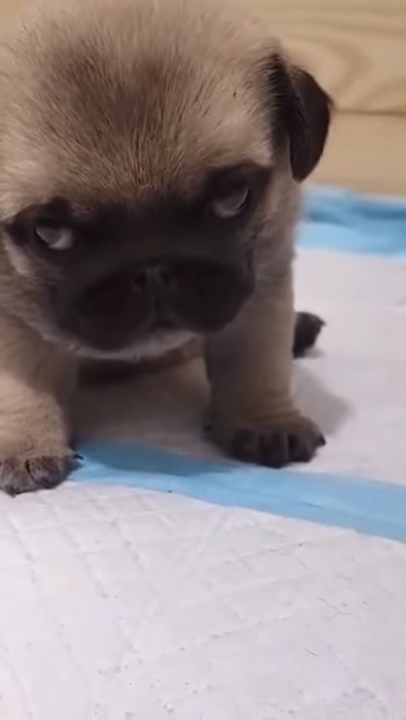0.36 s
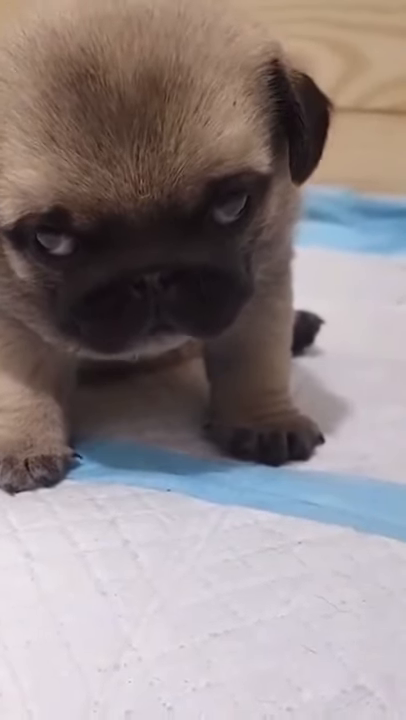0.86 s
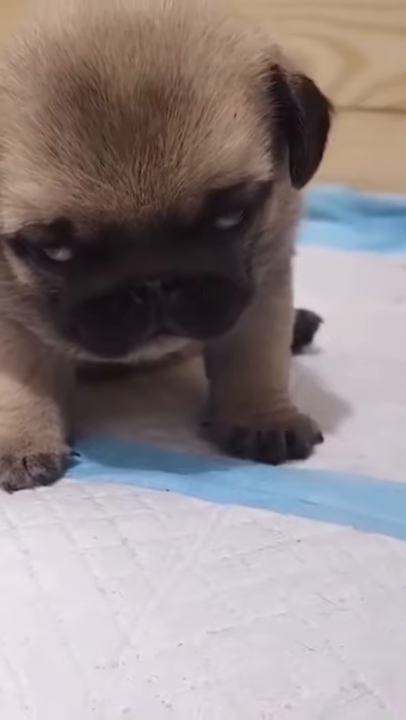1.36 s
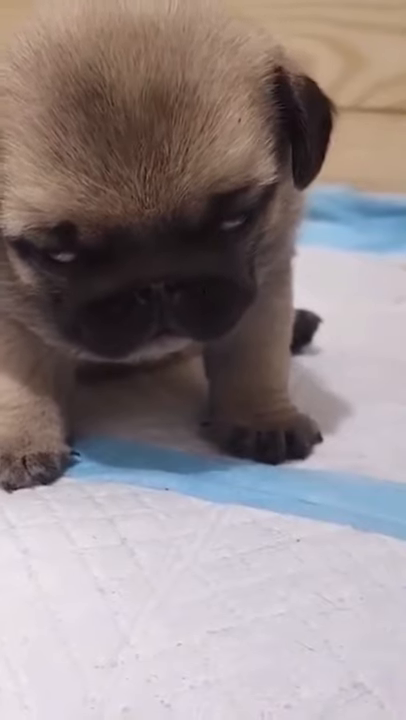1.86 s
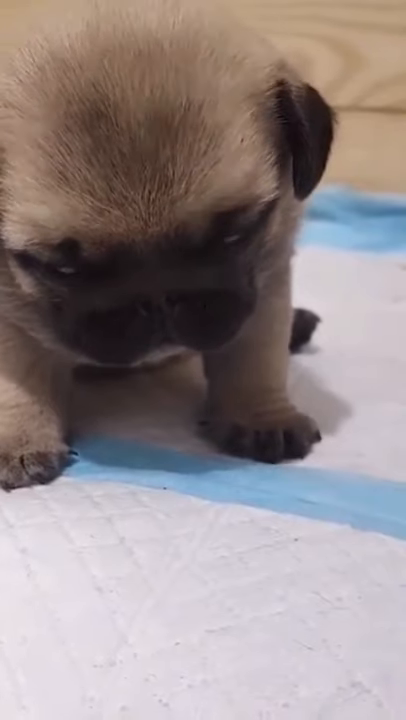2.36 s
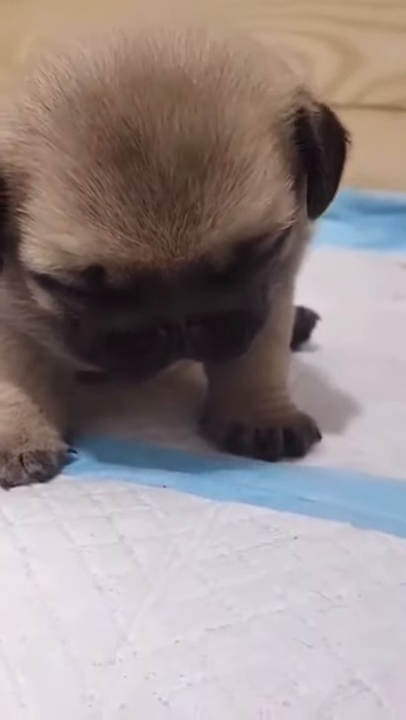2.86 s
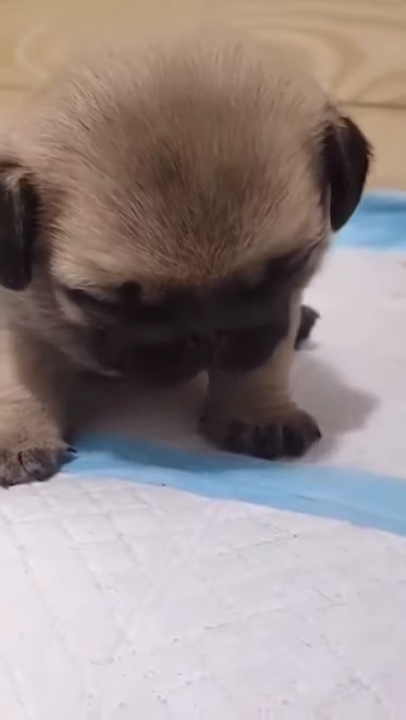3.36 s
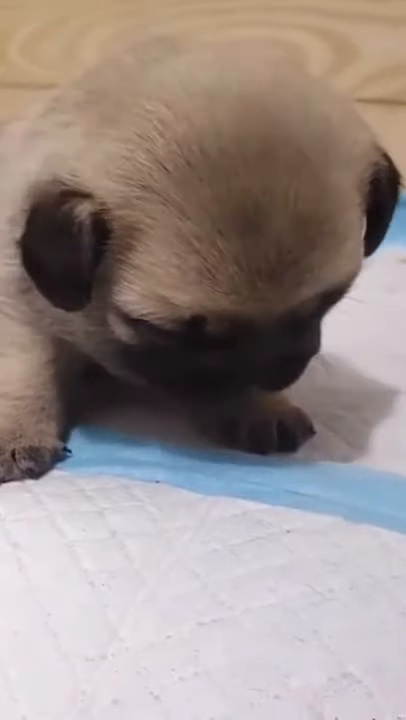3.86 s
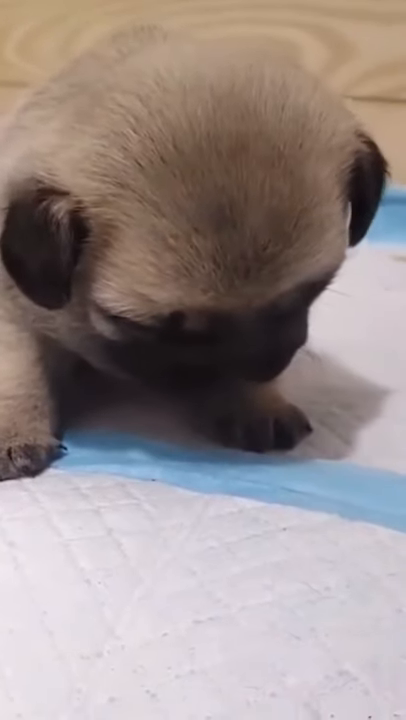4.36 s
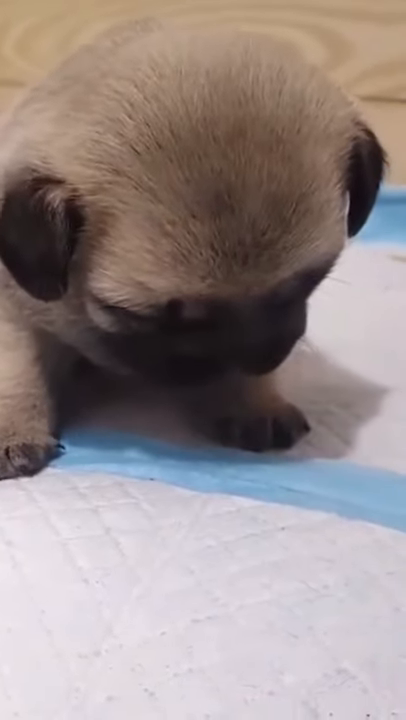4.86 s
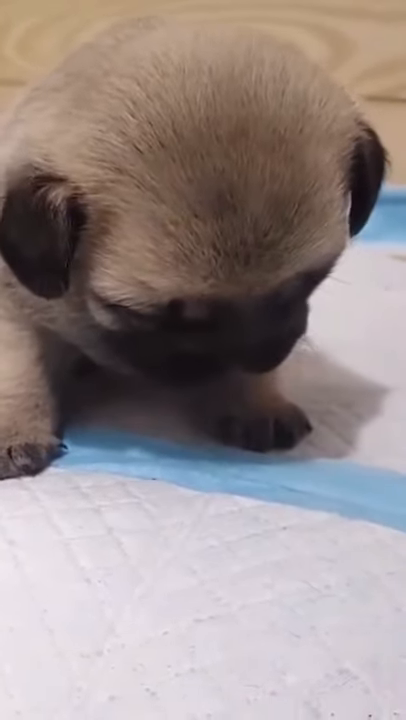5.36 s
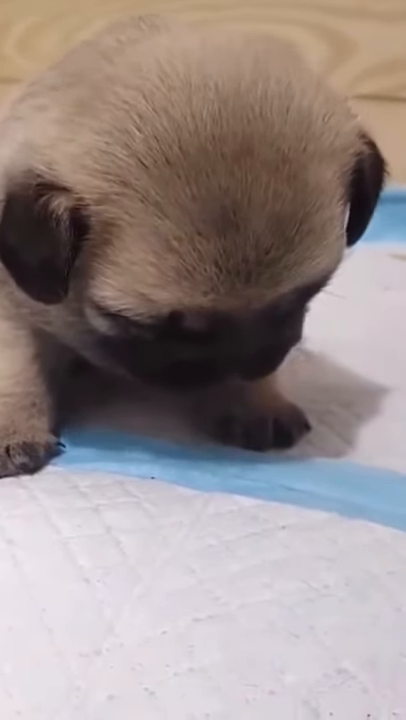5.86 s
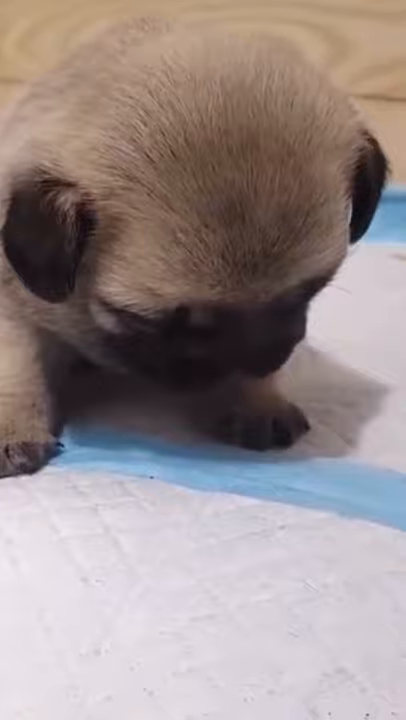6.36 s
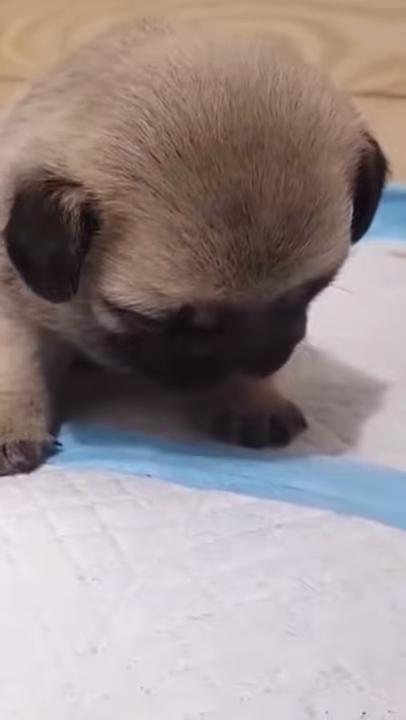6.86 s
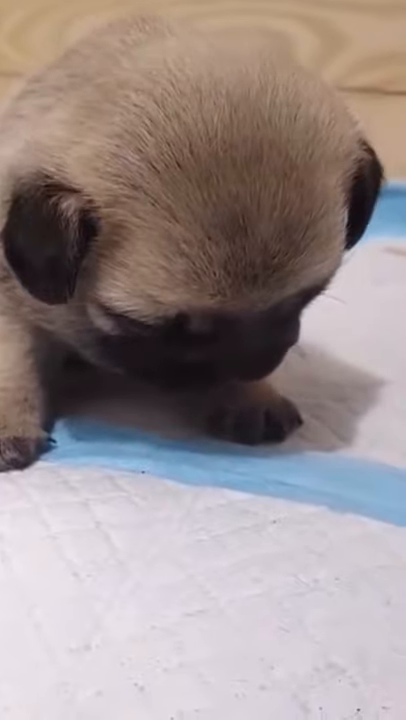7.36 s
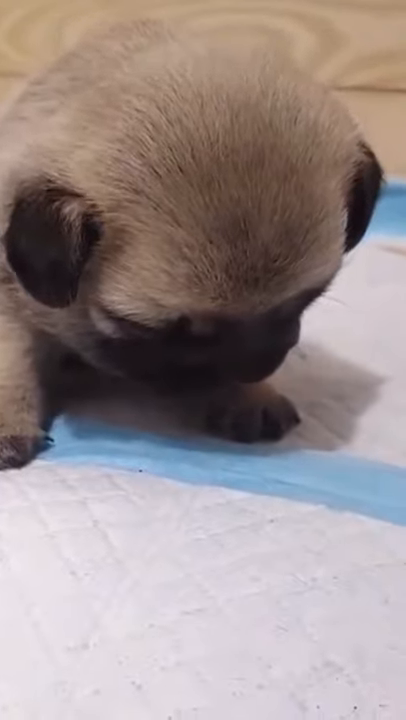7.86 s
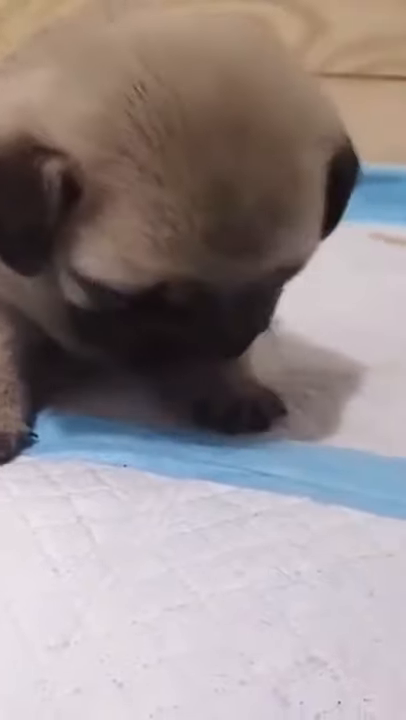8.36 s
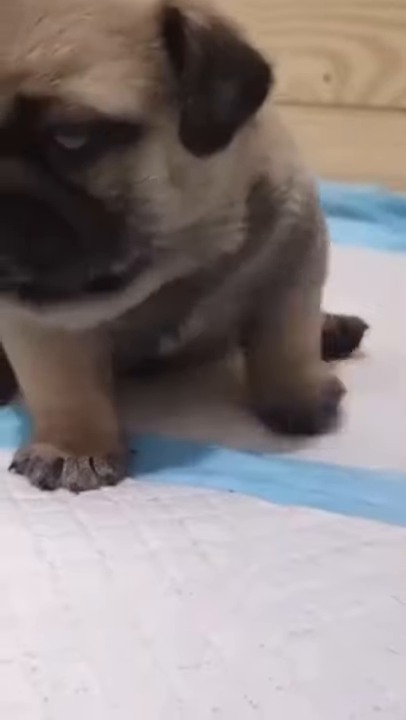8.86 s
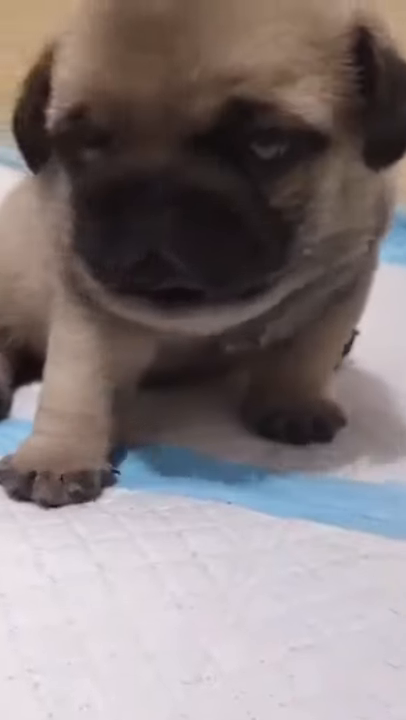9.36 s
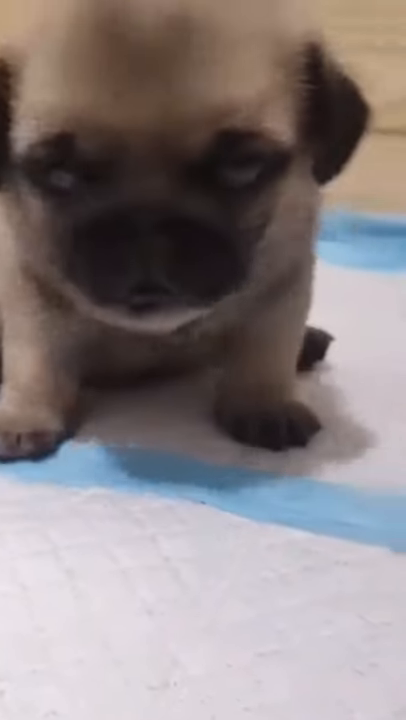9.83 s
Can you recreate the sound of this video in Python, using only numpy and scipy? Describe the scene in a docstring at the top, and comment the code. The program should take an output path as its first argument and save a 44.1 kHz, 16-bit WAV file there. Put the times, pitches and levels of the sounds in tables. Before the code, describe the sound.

Close to a phone microphone in a quiet room, a puppy shifts on a crinkly pad over wooden boards with soft thumps and scuffs. A rubber squeaky toy lets out one clean, falling squeak, then after more knocks comes a fast run of five bright airy squeezes with lower refilling squeaks between them. A few paw sounds follow over a low hum.

```python
"""A quiet room with a wooden floor: a rubber squeaky toy is worked close to a phone as a puppy shifts on a pad.
The toy is a reed driving a tube: high and airy on each squeeze, lower and clean as the toy refills.
Paws and hands knock and slide, sounding as decaying board modes and bursts of shaped noise; fur or cloth
brushes the pad as grainy noise. Behind lie a faint far tone of steady partials and a low hum of noise."""
import sys
import numpy as np
from scipy import signal
from scipy.fft import rfft, irfft
from scipy.io import wavfile
from scipy.ndimage import uniform_filter1d

SR = 44100
rng = np.random.default_rng(int(sys.argv[2]) if len(sys.argv) > 2 else 0)


def ratio_of_db(decibels):
    """Turn decibels (scalar or array-like) into linear amplitude factors; 0 dB maps to 1."""
    return 10 ** (np.asarray(decibels, float) / 20)


def to_wav(sig):
    """Store sig (one row per channel, or 1-D mono) as 16-bit WAV at the path in sys.argv[1].

    Samples outside -1..1 are clipped; the rate is SR.
    """
    pcm = np.clip(np.atleast_2d(sig), -1, 1) * 32767
    pcm = np.round(pcm).astype(np.int16)
    wavfile.write(sys.argv[1], SR, pcm.T)  # frames by channels


N = 439677  # samples
LEFT_RIGHT = np.array([[1], [-1]])  # signs of a side signal in the two channels


def shade(points, hz, axis=1):
    """Spectral envelope: dB of a (Hz, dB, ..) table at hz, interpolated on a log-frequency axis."""
    points = np.array(points, float)
    return np.interp(np.log(np.maximum(hz, 1)), np.log(points[:, 0]), points[:, axis])


def peaks(hz, modes):
    """Resonance: power passed by a set of (Hz, width Hz, dB) modes."""
    return sum(ratio_of_db(db) ** 2 / (1 + (2 * (hz - f) / w) ** 2) for f, w, db in modes)


def noise(size, gain):
    """Filtered noise: rms 1, with the amplitude spectrum gain(Hz)."""
    spectrum = rfft(rng.standard_normal(size)) * gain(np.fft.rfftfreq(size, 1 / SR))
    x = irfft(spectrum, size)
    return x / x.std()


def walk(size, rate):
    """Slow random modulation: spread 1, changing about rate times a second."""
    return noise(size, lambda hz: 1 / (1 + (hz / rate) ** 4))


def add(out, sound, s):
    """Superposition: sound is summed into out from s seconds on."""
    i = int(s * SR)
    out[..., i:i + sound.shape[-1]] += sound[..., :N - i]


# Resonances of the reed's tube: mode_hz, width_hz, squeeze_db, refill_db
TUBE_MODES = [(4250, 140, 23, 10), (6060, 180, 13.5, -24), (7710, 120, 17.5, 7.5), (9686, 81, 4.5, 5)]


def tube_modes(way):
    """Tube resonance: the modes as (Hz, width Hz, dB) for way 0 (squeeze) or 1 (refill)."""
    return [(row[0], row[1], row[2 + way]) for row in TUBE_MODES]


# Overtone strength between the tube's peaks: pitch_hz, squeeze_db, refill_db
OVERTONE_COLOUR = [(1399, -11.5, 2), (1890, -4, -10.5), (2035, 2, -1), (2070, 2, -26), (2190, -3, -7),
                   (3300, -12, -11.5), (4500, 8.5, -9), (6139, 3.5, -25), (8800, -19, -18),
                   (11000, -15, -16)]
# Level at the very top of the treble, with a narrow dip near 10.7 kHz: pitch_hz, level_db
TOP_LEVEL = [(10000, 0), (10700, -31.5), (11500, -5.5), (12700, -13), (13200, -35)]
# Pairs are (squeeze, refill)
JITTER = (.0036, .001)  # pitch unsteadiness as a share of the pitch
SHIMMER_DB = (.7, .5)  # each overtone wavers alone, by this much more every octave up
FALL, SAG = (2.6, 3.6), (0.96, 27)  # after the note: dying away in dB/ms, pitch sag in 1/s
BRIGHTEN = 0.5  # a refill's upper overtones gain this many dB an octave for each dB of fundamental
# On a squeeze the overtones above BLUR_HZ lose step with the reed, by about BLUR_RAD;
# that limit sinks with the reed's own pitch, by the power SLACK_BLUR
BLUR_RAD, BLUR_HZ, SLACK_BLUR = 1.2, 10000, 3


def reed(note, t, way):
    """Harmonic series of a slapping reed, shaped by tube resonance; returns the voice and the reed's phase."""
    s, hz, tone_db, over_db = np.transpose(note)
    late = np.maximum(t - s[-1], 0)
    tube = tube_modes(way)
    # pressure in the toy changes smoothly, so the pitch bends round its corners
    pitch = np.interp(t, s, hz) * np.exp(-SAG[way] * late)
    pitch = uniform_filter1d(uniform_filter1d(pitch, size=250), size=250)
    phase = 2 * np.pi * np.cumsum(pitch * (1 + JITTER[way] * walk(len(t), 270.0))) / SR

    k = np.arange(2, 20)[:, None]  # overtone numbers
    # the reed slaps once a cycle: overtones start in step, each tube peak turning them by half a turn
    lag = sum(np.arctan(2 * (k * pitch - f) / w) for f, w, _ in tube) + 0.17 * k ** 2
    wander = np.array([walk(len(t), 250.) for _ in k])
    clear_hz = BLUR_HZ * (pitch / pitch.max()) ** SLACK_BLUR
    lag = lag + (1 - way) * BLUR_RAD / (1 + (clear_hz / (k * pitch)) ** 12) * wander

    between = ratio_of_db(2 * shade(OVERTONE_COLOUR, k * pitch, axis=way + 1))
    colour = np.sqrt(between + peaks(k * pitch, tube)) * ratio_of_db(shade(TOP_LEVEL, k * pitch))
    tone = np.interp(t, s, tone_db)
    colour = colour * ratio_of_db(way * BRIGHTEN * (tone + 14) * np.log2(np.minimum(k, 12) / 2))
    shimmer = np.array([walk(len(t), 110.0) for _ in k])
    colour = colour * ratio_of_db(SHIMMER_DB[way] * np.log2(k) * shimmer)

    fade = ratio_of_db(-1000 * FALL[way] * late)  # with squeak()'s own fall, overtones die twice as fast as the tone
    overtones = (colour * np.cos(k * phase - lag)).sum(axis=0)
    return ratio_of_db(tone) * np.sin(phase) - fade * ratio_of_db(np.interp(t, s, over_db)) * overtones, phase


# Noise level beside the fundamental over the note: share of the note (0-1), squeeze_db, refill_db
NOISE_COURSE = [(0, -8, -26.5), (.12, -5.5, -39), (0.451, -12, -46.5), (0.752, -7.5, -44), (1, -13, -29.5)]
# Spectrum of that noise, relative: pitch_hz, squeeze_db, refill_db
NOISE_SPECTRUM = [(700, -21, -9), (2470, -8.5, -7.5), (3946, -25.5, -4.5), (5730, -2, -10),
                  (8200, -9, -2.5), (8700, -20.5, -11.5), (10970, -9, -9.5)]
SLAP_DB, SLAP_LOSS = -30, 9  # a weaker tone hardly slaps: overtones and noise lose this many dB per dB below


def note_noise(note, t, way, phase):
    """Amplitude modulation: broad noise with the tube's peaks, swelling once a cycle of the reed."""
    s, _, tone_db, _ = np.transpose(note)
    tube = tube_modes(way)

    def spectrum(f):
        return ratio_of_db(shade(NOISE_SPECTRUM, f, axis=way + 1) + shade(TOP_LEVEL, f)) * np.sqrt(1 + peaks(f, tube))

    # the noise differs between the channels above 5 kHz
    mid, side = noise(len(t), spectrum), noise(len(t), spectrum)
    side = signal.sosfilt(signal.butter(4, 5000, "high", fs=SR, output="sos"), side)
    share, *noise_db = np.transpose(NOISE_COURSE)
    # the opening is as short on a long note as on a quick one
    done = np.maximum((t - s[0]) / (s[-1] - s[0]), np.minimum((t - s[0]) / .11, share[1]))
    weak_db = SLAP_LOSS * min(tone_db[0] - SLAP_DB, 0)
    tone = np.interp(t, s, tone_db)
    level = ratio_of_db(np.interp(done, share, noise_db[way]) + tone + weak_db + 2.0 * walk(len(t), 60.))
    return (mid + side * LEFT_RIGHT) * (1 + .6 * np.cos(phase)) * level


# Pairs are (squeeze, refill)
RISE, NOISE_FALL = (8., 5.), (2.6, 1.2)  # onset, and dying away of the noise, dB/ms
PUFF_DB = -61.5  # low push of air on the microphone while the toy sounds
FLUTTER_DB, FLUTTER_S = (-24, -20.5), .022  # rough flutter over the tone as the reed catches; settling time
FLUTTER_HZ = (920, 614)  # centre and width of the flutter's band


def squeak(note, way):
    """Self-sustained reed: one note (way 0 squeezed, 1 refilling) of voice, noise, puff and catching flutter."""
    s, _, tone_db, _ = np.transpose(note)
    t = np.arange(s[0] - .03, s[-1] + .05, 1 / SR)
    early, late = np.maximum(s[0] - t, 0), np.maximum(t - s[-1], 0)
    voice, phase = reed(note, t, way)
    puff = ratio_of_db(PUFF_DB) * noise(len(t), lambda f: 1 / (1 + (f / 450) ** 3))
    flutter = noise(len(t), lambda f: peaks(f, [(*FLUTTER_HZ, 0)]))
    flutter = flutter * ratio_of_db(np.interp(t, s, tone_db) + FLUTTER_DB[way])
    flutter = flutter * np.exp(-np.maximum(t - s[0], 0) / FLUTTER_S)
    edge = ratio_of_db(-1000 * (RISE[way] * early + FALL[way] * late))
    noise_edge = ratio_of_db(-1000 * (RISE[way] * early + NOISE_FALL[way] * late))
    return t[0], edge * (np.sqrt(2) * voice + puff + flutter) + noise_edge * note_noise(note, t, way, phase)


# One squeeze of the hand: share of the note (0-1), pressure (0-1), fundamental_db, overtones_db
GRIP_COURSE = [(0, .5, -21.5, -41), (.1, .76, -29, -34), (0.198, .92, -24.5, -33.5), (0.341, 1, -22.5, -30),
               (0.499, .88, -24, -33.5), (.66, .55, -25, -37.5), (0.832, .29, -23, -41.5),
               (1.001, 0, -29.5, -76.5)]
SLACK_HZ = 790  # pitch of the reed as the squeeze runs out


def squeezed(start, end, top_hz, db):
    """Pressure-controlled pitch: the note table of one squeeze, higher with more pressure."""
    return [(start + share * (end - start), SLACK_HZ + push * (top_hz - SLACK_HZ), tone + db, over + db)
            for share, push, tone, over in GRIP_COURSE]


# The shell springing back: share of the note (0-1), suction (1 full, negative past rest), fundamental_db
SPRING_COURSE = [(0.259, 0.95, -12.5), (0.548, .55, -14), (.91, 0, -15.5), (0.999, -.7, -28.5)]
CATCH_HZ, CATCH_DB, EASED_HZ = 772.7, -14, 711.6  # the reed as a refill starts; its pitch as suction eases


def refilled(start, end, top_hz, db):
    """Elastic recoil: the (s, Hz, dB) course of one quick refill, higher with more suction."""
    caught = [(start, CATCH_HZ, CATCH_DB + db)]
    return caught + [(start + share * (end - start), EASED_HZ + pull * (top_hz - EASED_HZ), tone + db)
                     for share, pull, tone in SPRING_COURSE]


REFILL_OVER_DB, OVER_SLOPE = -37.5, 0.44  # overtones at a fundamental of -16.5 dB; dB per dB of fundamental


def with_overtones(course):
    """Nonlinear spectral growth: on a refill the overtones follow the strength of the tone."""
    return [(s, hz, db, REFILL_OVER_DB + OVER_SLOPE * (db + 16.5) - SLAP_LOSS * max(SLAP_DB - db, 0))
            for s, hz, db in course]


# Air seeping through the tube before the long refill: start_s, end_s, level_db reached
AIR_LEAK = (3.335, 3.385, -50.5)


def leak():
    """Turbulence in a tube: noise through its upper modes, three times as wide, rising by 12 dB."""
    start, end, db = AIR_LEAK
    size = int((end - start) * SR)
    modes = [(f, 3 * w, refill_db) for f, w, _, refill_db in TUBE_MODES[2:]]
    seep = noise(size, lambda f: np.sqrt(peaks(f, modes) + .1) * ratio_of_db(shade(TOP_LEVEL, f)))
    return start, ratio_of_db(db - 12 * np.linspace(1, 0, size)) * seep


# Squeezes of the toy: start_s, end_s, top_pitch_hz, strength_db
SQUEEZE_NOTES = [(7.349, 7.439, 1234, 0.5), (7.645, 7.75, 1266, 1), (7.926, 8.014, 1197, 0),
                 (8.221, 8.33, 1231, 0.5), (8.504, 8.596, 1191, -0.5)]
# Quick refills between squeezes: start_s, end_s, top_pitch_hz, strength_db
QUICK_REFILLS = [(7.487, 7.598, 772.3, -1), (7.795, 7.895, 808.5, -0.5), (8.066, 8.175, 768, -1.5),
                 (8.38, 8.476, 801.5, -1.5)]
# The one long, slow refill: time_s, pitch_hz, fundamental_db
SLOW_REFILL = [(3.383, 740, -10), (3.416, 734, -9.5), (3.455, 720.8, -11), (3.499, 700, -14.5),
               (3.561, 671, -16.5), (3.605, 651.7, -18), (3.642, 665, -17), (3.679, 655.6, -18),
               (3.702, 574, -30)]
# The reed stirring before it catches: time_s, pitch_hz, fundamental_db
REED_STIR = [(3.359, 751, -32), (3.372, 818.3, -37), (3.378, 837, -22.5)]
NEAR_DB, NEAR_T60 = -21, .075  # echoes off the floor and hands close to the toy: level, decay in s


def toy():
    """Direct sound and early reflections: all notes straight ahead, with a short haze of nearby echoes."""
    out = np.zeros((2, N))
    squeezes = [squeezed(*row) for row in SQUEEZE_NOTES]
    courses = [REED_STIR, SLOW_REFILL] + [refilled(*row) for row in QUICK_REFILLS]
    refills = [with_overtones(course) for course in courses]
    for way, notes in enumerate((squeezes, refills)):
        for note in notes:
            s, sound = squeak(note, way)
            add(out, sound, s)
    s, seep = leak()
    add(out, seep, s)
    t = np.arange(SR // 8) / SR
    echoes = rng.standard_normal(len(t)) * ratio_of_db(-60 * t / NEAR_T60)
    echoes = echoes / np.linalg.norm(echoes)
    return out + ratio_of_db(NEAR_DB) * signal.fftconvolve(out, echoes[None])[:, :N]


# A paw or hand coming down, levels relative: time_s, level_db, thump_db, scuff_db,
# near_hz (boards nearest this pitch are struck hardest)
PAW_TAPS = [(0.144, -53.5, -16.5, -24, 680), (0.245, -63, -4.5, -25, 790), (0.44, -64, -3, -30, 750),
            (1.006, -57.5, -4, -15, 800), (1.072, -51.5, -9.5, -14, 1000),
            (2.282, -32.5, -18.5, -15.5, 590), (2.996, -54, -13, -30, 1170), (4.182, -58.5, -9.5, -12, 700),
            (4.238, -67, -3, -30, 760), (4.756, -43, -13, -19, 484), (5.094, -57.5, -7.5, -34, 1074),
            (5.198, -60.5, -3, -25, 478.5), (5.414, -48, -3, -8, 580), (5.669, -47.5, -16, -15, 1084),
            (5.807, -60.5, -9.5, -0.5, 843), (5.868, -55.5, -6.5, -7.5, 337), (6.546, -48.5, -20, -31, 891),
            (7.201, -63, -8.5, -30.5, 1012), (7.317, -66, -6, -25, 1496), (8.61, -60.5, -3.5, -32, 402.5),
            (8.932, -49.5, -6.5, -11.5, 414), (8.972, -57, -2.5, -9, 403), (9.857, -50, -15.5, -23, 649)]
# A paw sliding over the pad, levels relative: time_s, level_db, scuff_db, decay_t60_s
PAW_SLIDES = [(0.714, -54.5, -3, 0.28), (0.901, -56.5, -11, 0.43), (1.484, -44, -10.5, 0.44),
              (1.815, -32, -14, 0.31), (2.239, -49, -10, 0.84), (4.046, -50, -12, 0.23),
              (4.582, -47.5, -14, 0.49), (4.907, -43.5, -7.5, 0.49), (9.11, -57.5, -2.5, 0.43)]
TAP_T60, DEEP = 0.35, 0.37  # s at 400 Hz; lower boards last longer, by this power of the pitch
TAP_DULL = 2.06  # a tap's knock lies this many times lower than a slide's
SLIDE_THUMP_DB, SLIDE_HZ = -70, 1070  # a slide barely stirs the boards, however loud the pad


def contacts():
    """Impact and friction: every touch as (s, level dB, thump dB, scuff dB, t60 s, boards Hz, dullness)."""
    taps = [(s, level, thump, scuff, TAP_T60 * (400 / hz) ** DEEP, hz, TAP_DULL)
            for s, level, thump, scuff, hz in PAW_TAPS]
    slides = [(s, level, SLIDE_THUMP_DB - level, scuff, t60, SLIDE_HZ, 1)
              for s, level, scuff, t60 in PAW_SLIDES]
    return taps + slides


# Modes of the floor boards, levels relative: mode_hz, width_hz, level_db
BOARD_MODES = [(150, 72, 5.5), (328.6, 22, 3.5), (397, 10, 5), (488.2, 22, 9), (665, 47, -1.5),
               (828, 26, 1.5), (1170, 69, 2.5), (1760, 45, 1)]
# Spectrum of the knock's body, relative: pitch_hz, level_db
KNOCK_SPECTRUM = [(700, -20.5), (1200, -5.5), (3000, -2.5), (5000, -12.5), (14000, -29)]
SNAP = 0.31  # the pad's first crack gains this many dB for each dB of strength


def knocks():
    """Modal impact and reverberation: the pad crinkles, the boards thump and all dies away in the room."""
    out, size, lead = np.zeros((2, N)), SR // 2, .05
    t = np.arange(size) / SR - lead
    after = np.maximum(t, 0)
    for s, level_db, thump_db, scuff_db, t60, near_hz, dull in contacts():
        struck = [(f, w, db - 8 * abs(np.log2(f / near_hz))) for f, w, db in BOARD_MODES]
        tail = ratio_of_db(-60 * after / t60) * (1 - np.exp(-after / 0.0086))
        # the blow starts all modes in step; each spot rings a little differently
        ring = 0
        for f, w, db in struck:
            u, v = rng.standard_normal(2)
            mode = np.sin(2 * np.pi * f * (1 + .015 * v) * after) * np.exp(-np.pi * w * after)
            ring = ring + ratio_of_db(db + 2.5 * u) * mode
        ring = 4.6 * ring / ring.max()
        direct = 2.93 * np.exp(-after / 0.0072) * (1 - np.exp(-after / 0.0005))
        drag = 0.43 * np.exp(-np.abs(t) / 0.0098)

        def layers(first):
            """Superposed boards, knock body and bright scuff; first=0 leaves out the direct blow."""
            crinkle = first * direct * ratio_of_db(SNAP * (level_db + 25)) + tail + drag
            # the creased pad rings at other pitches every time
            rings = ratio_of_db(3 * walk(size // 2 + 1, 500.))
            haze = tail * noise(size, lambda f: np.sqrt(peaks(f, struck)) / (1 + (f / 2500) ** 2))
            body = noise(size, lambda f: rings * ratio_of_db(shade(KNOCK_SPECTRUM, f * dull)))
            scuff = noise(size, lambda f: rings * f ** 4 / (f ** 4 + 4500.0 ** 4) / (1 + (f / 9000) ** 4))
            boards = ratio_of_db(thump_db + 10.0) * (first * ring + haze)
            return boards + crinkle * (ratio_of_db(-9.5) * body + ratio_of_db(scuff_db) * scuff)

        # the echoes differ left and right, the first sound does not
        add(out, ratio_of_db(level_db) * (layers(1) / 2 + 0.28 * layers(0) * LEFT_RIGHT), s - lead)
    return out


# Fur or cloth brushing the pad: start_s, end_s, level_db, centre_hz
PAD_BRUSHES = [(0.64, 1.123, -77, 1370), (8.667, 8.857, -68, 4500)]


def brushes():
    """Friction noise: soft grainy rustles that swell and fade, partly unlike left and right."""
    out = np.zeros((2, N))
    for start, end, db, hz in PAD_BRUSHES:
        size = int((end - start) * SR)
        mid, side = (noise(size, lambda f: f / hz / (1 + (f / hz) ** 1.7)) for _ in range(2))
        grain = ratio_of_db(db + 2.2 * walk(size, 28.0)) * signal.windows.tukey(size, .5)
        add(out, grain * (mid + .5 * side * LEFT_RIGHT), start)
    return out


# A faint steady tone, far off, heard twice: start_s, end_s, level_db
FAR_NOTES = [(2.086, 2.237, -69), (3.865, 4.07, -74.5)]
# Its partials: multiple of FAR_HZ, relative level_db
FAR_SERIES = [(4, -11), (5, -3)]
FAR_HZ = 330


def far_tone():
    """Additive synthesis: a few steady harmonic partials that fade in and out."""
    out = np.zeros(N)
    for start, end, db in FAR_NOTES:
        t = np.arange(0, end - start, 1 / SR)
        partials = sum(ratio_of_db(p_db) * np.sin(2 * np.pi * k * FAR_HZ * t) for k, p_db in FAR_SERIES)
        add(out, ratio_of_db(db) * partials * signal.windows.tukey(len(t), .3), start)
    return out


# Spectrum of the hum, relative: pitch_hz, level_db (per Hz)
HUM_SPECTRUM = [(20, -13), (65, -0.5), (159, -7), (208, -5), (350, -16.5), (730, -20.5), (2490, -35.5),
                (5340, -39), (7010, -36.5), (12600, -40.5)]
# Extra tilt of its side signal, shape only: pitch_hz, level_db
HUM_SIDE_TILT = [(30, -12), (200, -15), (1000, -10), (4000, -1.5), (6000, -10), (13000, -14)]
HUM_DB = -62.5


def room():
    """Background noise: the house's hum swells a little, the upper bands flicker, the bass leans right."""
    mid = noise(N, lambda f: ratio_of_db(shade(HUM_SPECTRUM, f)))
    side = ratio_of_db(-7.5) * noise(N, lambda f: ratio_of_db(shade(HUM_SPECTRUM, f) + shade(HUM_SIDE_TILT, f)))
    hum = mid + side * LEFT_RIGHT
    low = signal.sosfilt(signal.butter(2, 500, fs=SR, output="sos"), hum)
    lean = ratio_of_db(np.array([[-.6], [.6]]))
    swelling = low * lean * ratio_of_db(1.0 * walk(N, 0.94))
    rustling = (hum - low) * ratio_of_db(1.4 * walk(N, 23.0) + walk(N, 5.5))
    return ratio_of_db(HUM_DB) * (swelling + rustling)


def scene():
    """Superposition of all sources, the main one first."""
    return toy() + knocks() + brushes() + far_tone() + room()


def roll_off(x):
    """The treble ends steeply here."""
    return signal.sosfilt(signal.butter(12, 13640, fs=SR, output="sos"), x)


def record(dry):
    """Low-pass filtering: the phone cuts the top steeply above 13.1 kHz."""
    cut = signal.sosfilt(signal.ellip(8, .2, 60, 13100, fs=SR, output="sos"), dry)
    return roll_off(cut)


dry = scene()
out = record(dry)
to_wav(out)
```